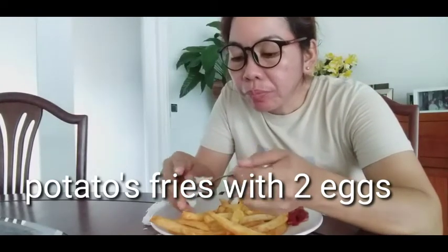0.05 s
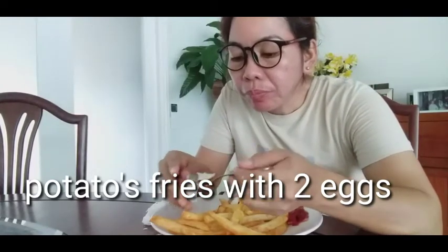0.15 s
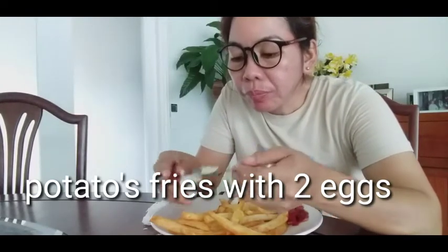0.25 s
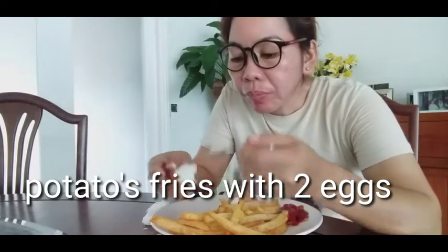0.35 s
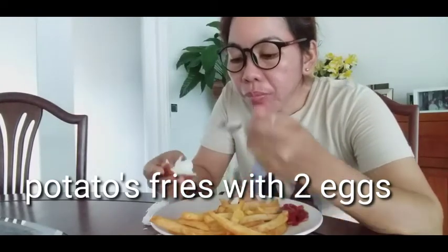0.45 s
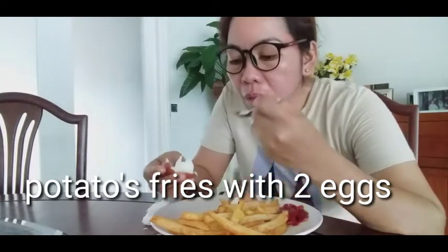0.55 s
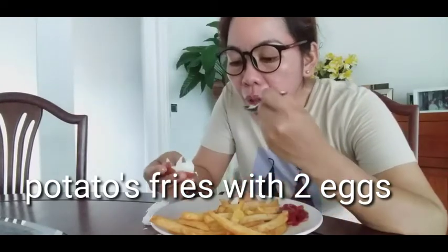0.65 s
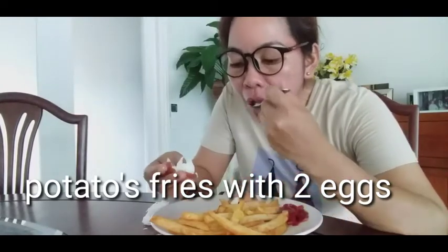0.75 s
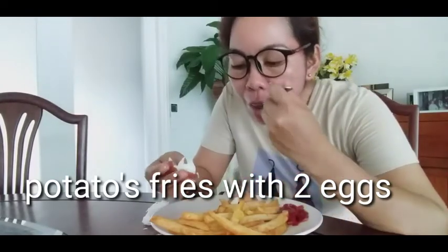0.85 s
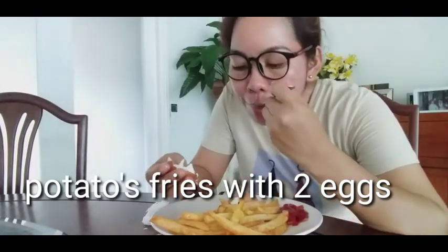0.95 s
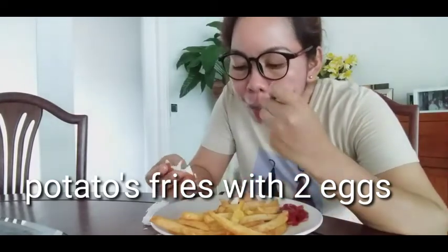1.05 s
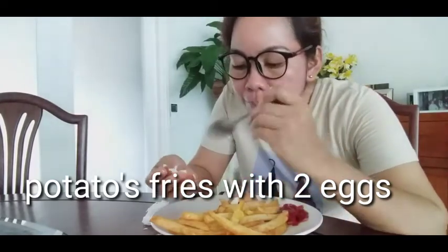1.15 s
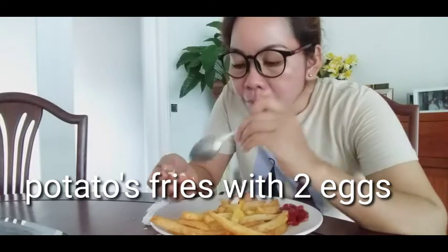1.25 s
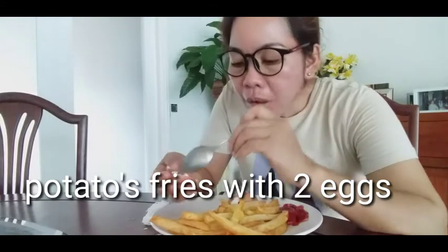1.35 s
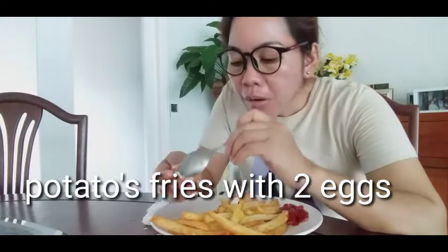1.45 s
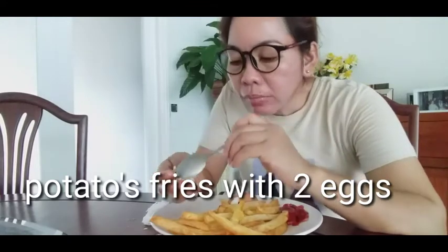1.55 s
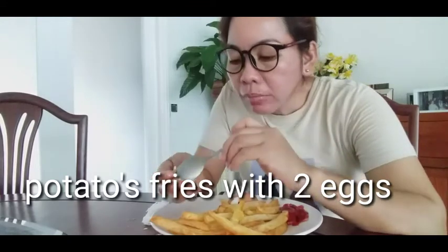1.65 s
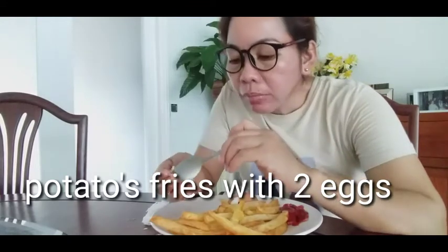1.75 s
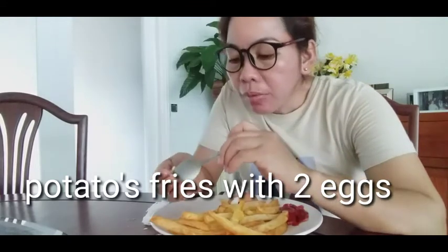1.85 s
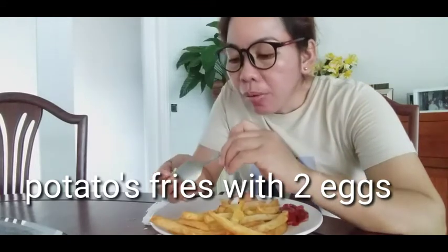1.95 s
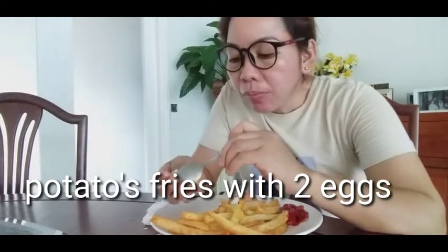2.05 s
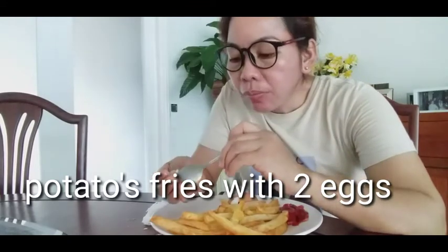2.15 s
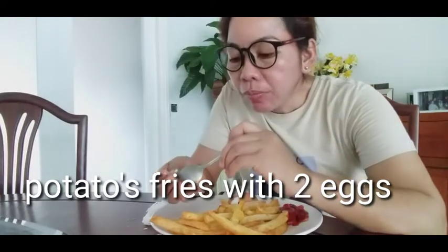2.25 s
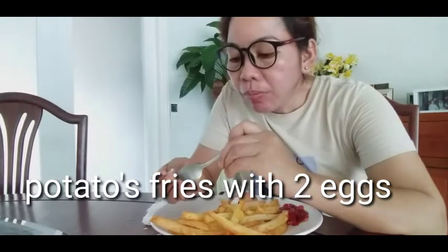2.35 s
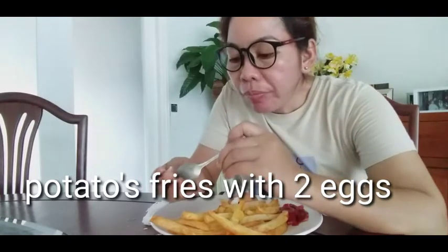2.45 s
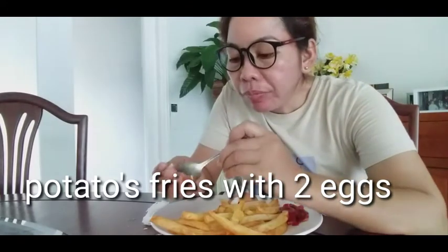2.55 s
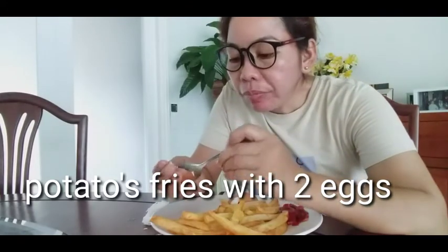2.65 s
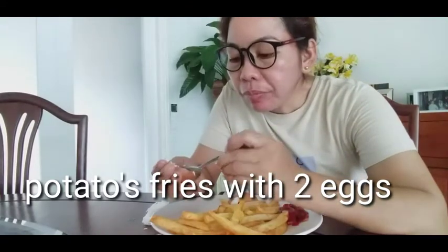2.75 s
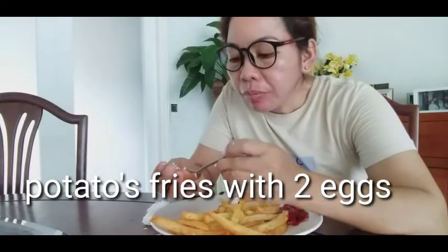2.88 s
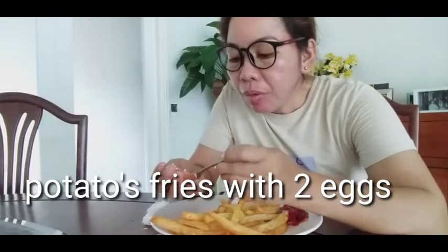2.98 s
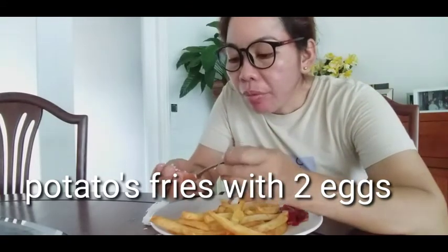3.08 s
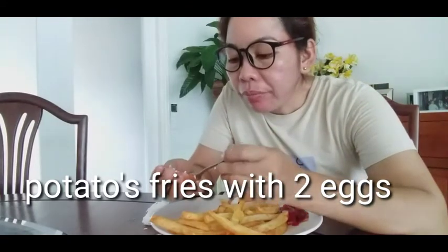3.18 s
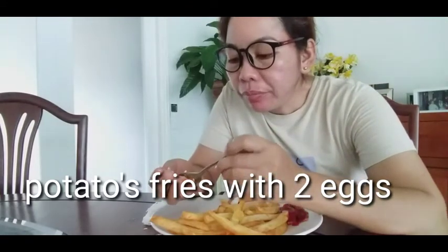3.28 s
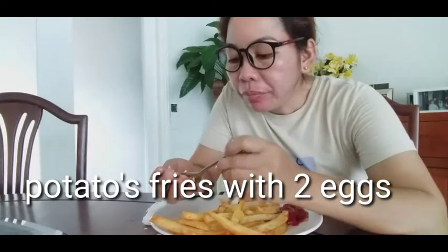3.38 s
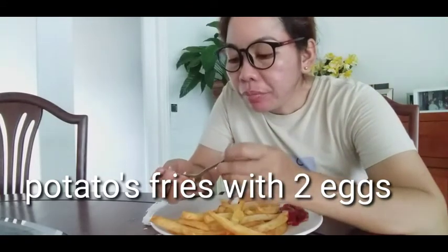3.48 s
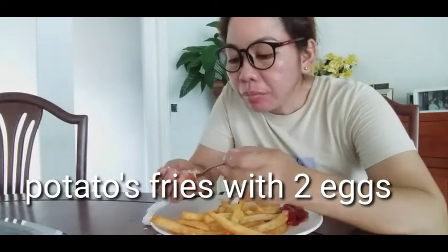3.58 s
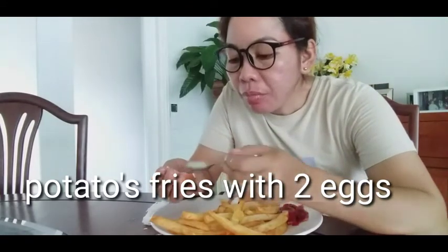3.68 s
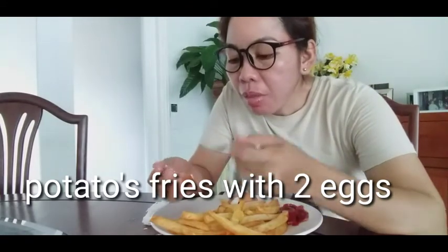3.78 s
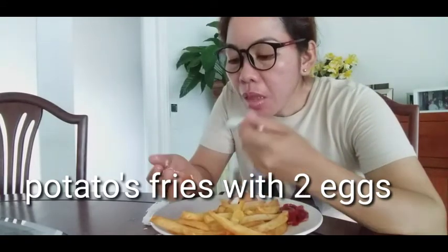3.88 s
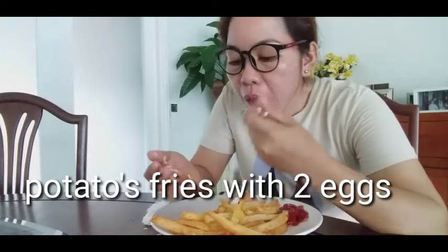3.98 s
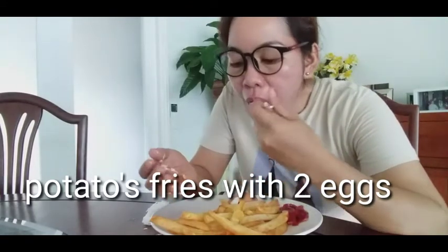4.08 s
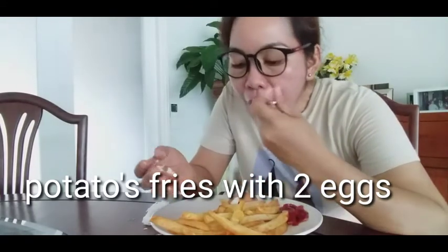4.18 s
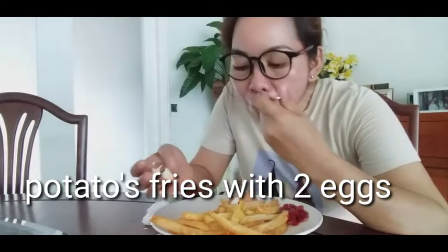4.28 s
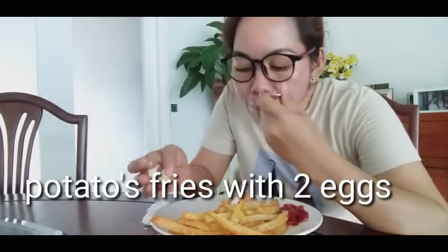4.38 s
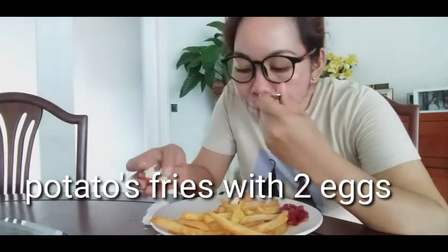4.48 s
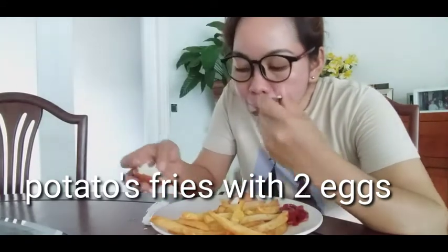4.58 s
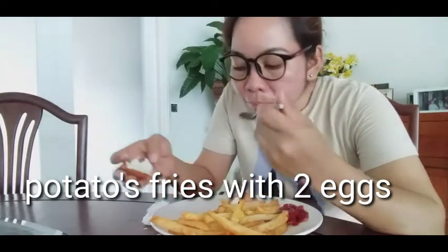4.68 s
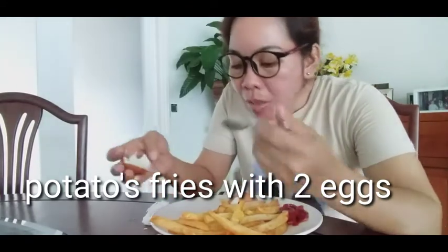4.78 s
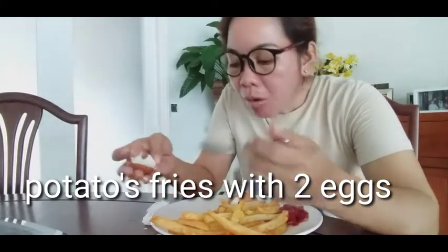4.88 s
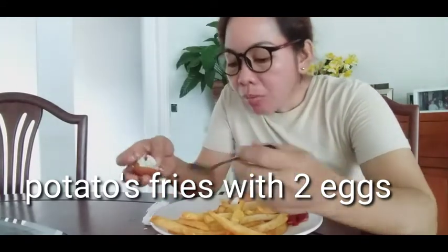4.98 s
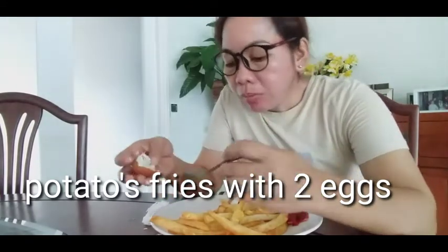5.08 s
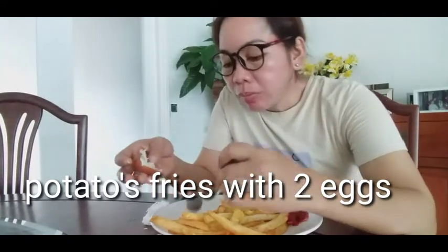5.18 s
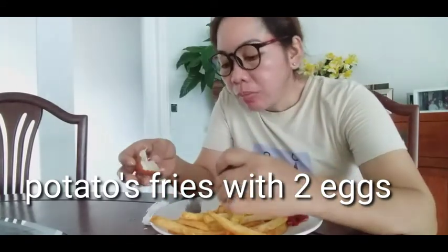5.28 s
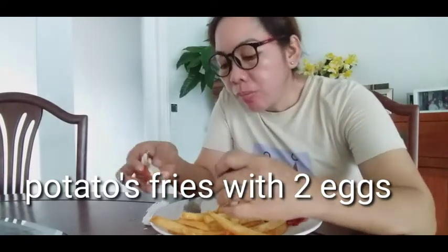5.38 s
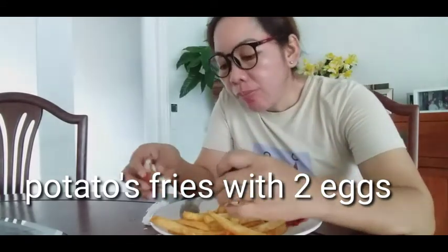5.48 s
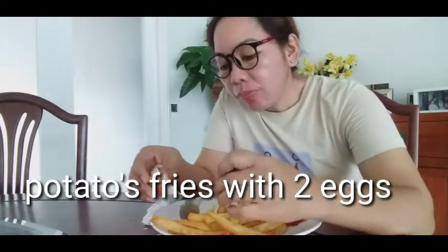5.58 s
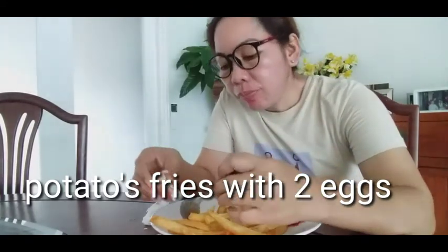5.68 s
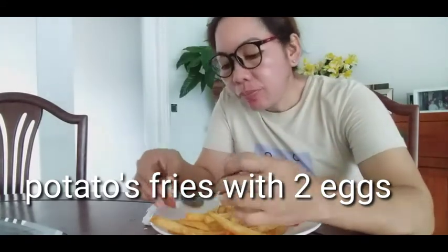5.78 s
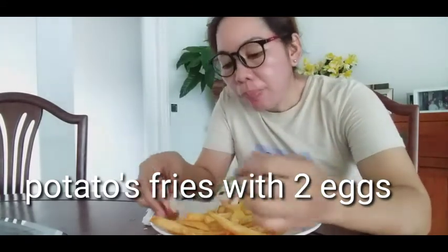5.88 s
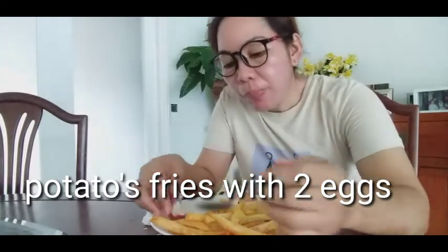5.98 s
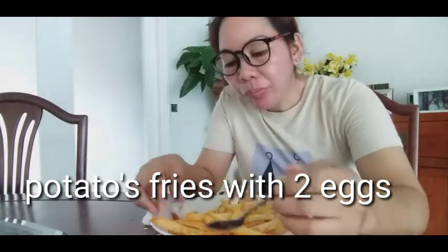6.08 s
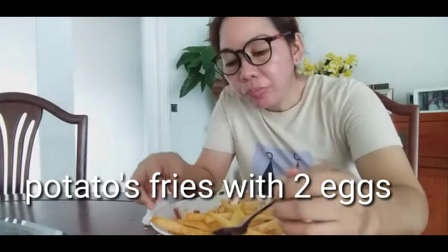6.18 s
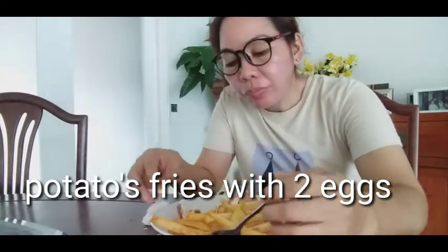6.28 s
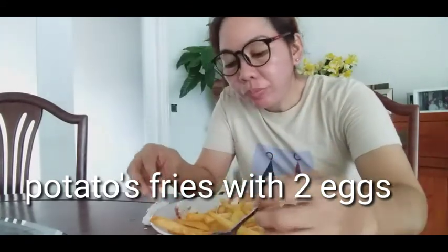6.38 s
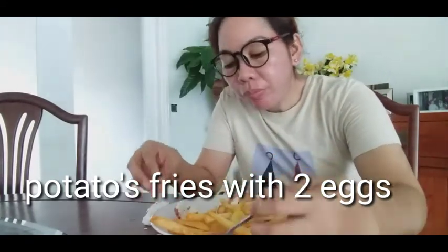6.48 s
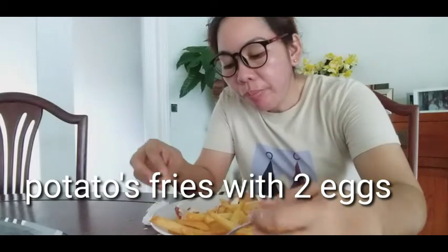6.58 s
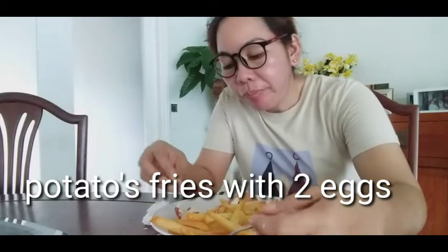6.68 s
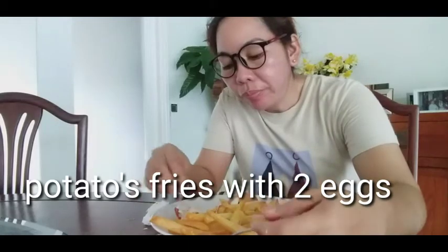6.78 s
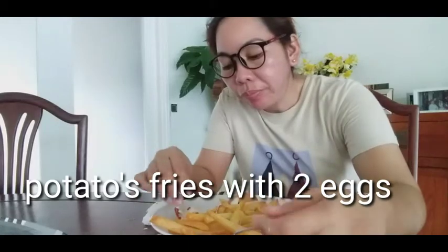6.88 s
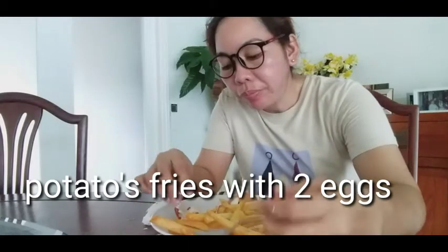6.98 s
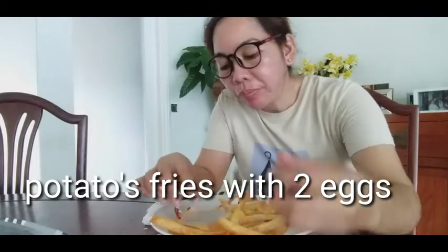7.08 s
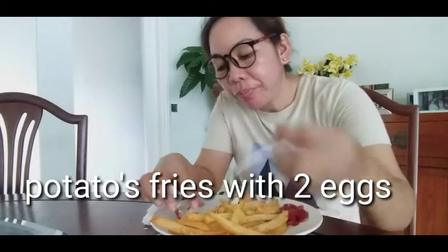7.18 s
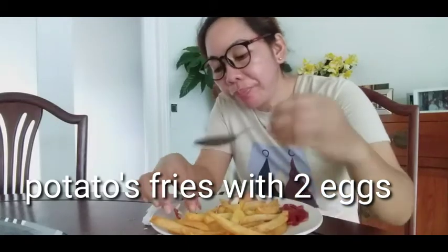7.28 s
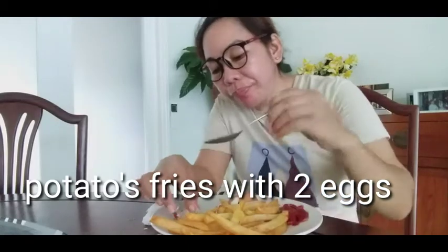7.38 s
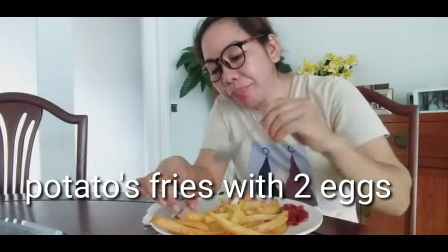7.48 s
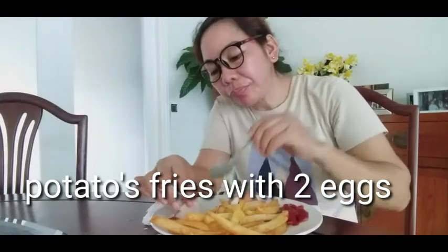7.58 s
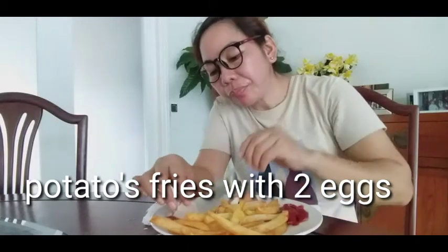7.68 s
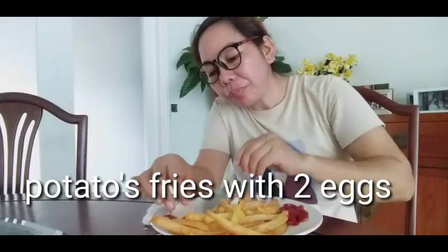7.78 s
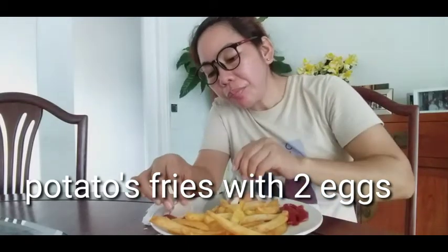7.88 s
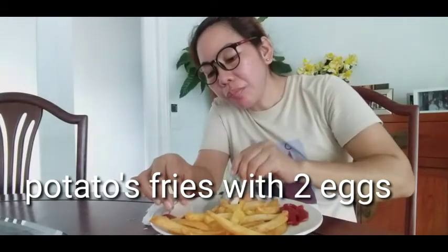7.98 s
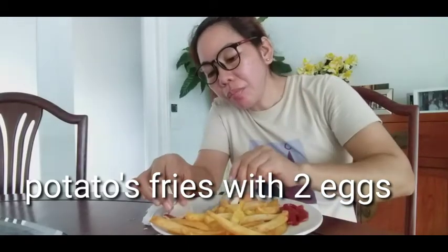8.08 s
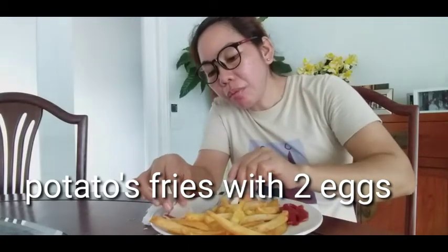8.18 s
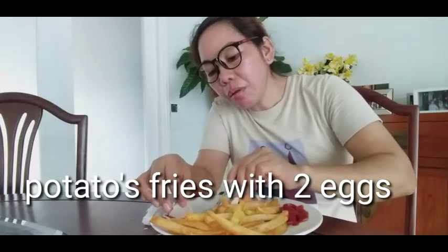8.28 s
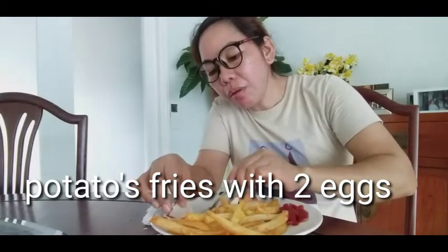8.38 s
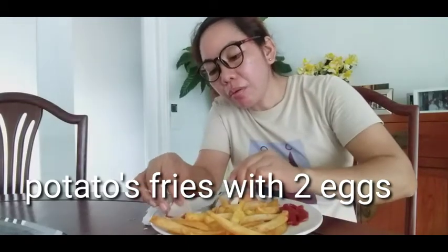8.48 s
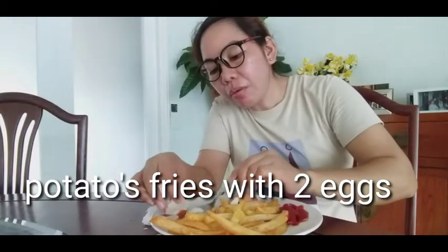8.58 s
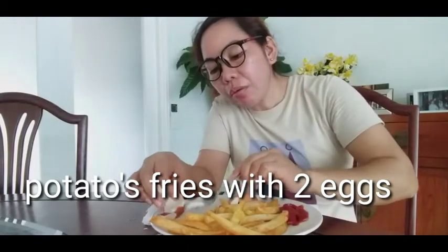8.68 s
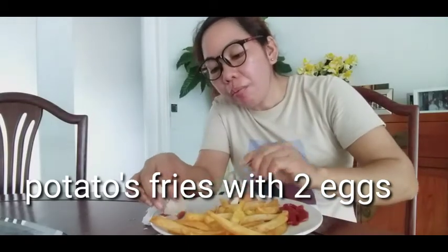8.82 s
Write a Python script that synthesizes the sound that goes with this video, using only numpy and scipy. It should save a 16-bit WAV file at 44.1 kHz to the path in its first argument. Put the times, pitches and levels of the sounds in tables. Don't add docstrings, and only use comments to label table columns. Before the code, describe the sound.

A faint engine speeds away outside over low room hum. Near the microphone, egg knocks start softly, then shell snaps in irregular brittle ticks with a few sharp peaks. After a thinner stretch, a steel spoon hits a ceramic plate on a wooden table, bright and briefly ringing, the second big blow hardest. A softer thudding tap and two short drags over the glaze end it, with slight indoor echo.

```python
import sys
import numpy as np
from scipy import signal
from scipy.fft import rfft, irfft
from scipy.io import wavfile

SR = 44100
rng = np.random.default_rng(int(sys.argv[2]) if len(sys.argv) > 2 else 0)


def unload_audio(sound):
    columns = np.transpose(np.atleast_2d(sound))
    steps = np.round(np.clip(columns, -1, 1) * 32767)
    wavfile.write(sys.argv[1], SR, steps.astype(np.int16))


def ratio_of_db(decibels):
    return 10 ** (np.asarray(decibels, float) / 20)


N = 390285


def rms_one(x):
    return x / np.sqrt(np.mean(x ** 2) + 1e-20)


def at_hz(points, hz):
    table_hz, values = np.array(points).T
    return np.interp(np.log(hz + 1), np.log(table_hz), values)


def in_time(points):
    s, values = np.transpose(points)
    return np.interp(np.arange(N) / SR, s, values)


def drift(rate_hz):
    knots = rng.standard_normal(1000)
    return 1.2 * np.interp(np.arange(N) / SR * rate_hz, np.arange(1000), knots)


def ring(clicks, hz, t60):
    r, w = ratio_of_db(-60 / (t60 * SR)), 2 * np.pi * hz / SR
    return signal.lfilter([0, np.sin(w)], [1, -2 * r * np.cos(w), r * r], clicks + 1e-18)


def struck(modes):
    click = np.eye(1, SR)[0]
    out = np.zeros(SR)
    for k, (hz, db, t60) in enumerate(modes):
        sign = (-1) ** (k // 2)
        out += sign * ratio_of_db(db) * ring(click, hz, t60)
    return out


def band(x, low_hz, high_hz):
    return signal.sosfilt(signal.butter(2, [low_hz, high_hz], "band", fs=SR, output="sos"), x)


def coloured(spectrum, size):
    hz = np.arange(size // 2 + 1) * SR / size
    shaped = rfft(rng.standard_normal(size)) * ratio_of_db(at_hz(spectrum, hz))
    return rms_one(irfft(shaped, size))


def add(out, sound, s):
    at = round(s * SR)
    out[at:at + len(sound)] += sound[:N - at]


# time in seconds, firing rate in Hz.
ENGINE_SPEED = [(0, 67), (.7, 72.4), (1.45, 80.1), (1.8, 81.1), (2.3, 87.65), (3.6, 88.5)]
# start in seconds, length in seconds, # level in dB of the 2nd multiple, level
# in dB of the 3rd multiple.
SURGES = [
    (-.03, 0.29, -86, -57),
    (.33, 0.11, -73, -64),
    (.58, 0.097, -57.5, -67),
    (.87, 0.18, -59.5, -62),
    (1.13, 0.09, -58.5, -78),
    (1.42, 0.32, -55, -68),
    (2.05, 0.271, -65, -71),
    (2.67, 0.11, -59.5, -84),
    (2.97, 0.13, -62, -68.5),
    (3.47, 0.088, -62, -87),
]


def engine():
    t = np.arange(N) / SR
    phase = 2 * np.pi * np.cumsum(in_time(ENGINE_SPEED)) / SR
    recede_db = -8.5 * t
    second = ratio_of_db(-69 + recede_db)
    third = second
    edge_s = 0.031
    for s, length, second_db, third_db in SURGES:
        surge = np.clip(np.minimum(t - s, s + length + edge_s - t) / edge_s, 0, 1)
        second = second + ratio_of_db(second_db) * surge
        third = third + ratio_of_db(third_db) * surge
    upper = ratio_of_db(-68 + recede_db) * np.minimum(t / 0.36, 1)
    levels = [ratio_of_db(-9.5) * second, second, third, ratio_of_db(-14.5) * third, ratio_of_db(-0.5) * upper, upper]
    return 2 ** .5 * sum(level * np.sin((k + 1) * phase) for k, level in enumerate(levels))


def fridge_hum():
    hum_hz, hum_db = 98.4, -65.5
    level = ratio_of_db(hum_db + 2.2 * drift(6.4))
    return 2 ** .5 * level * np.sin(2 * np.pi * hum_hz * np.arange(N) / SR)


# frequency in Hz, density in dB per Hz.
AIR = [(34, -44), (52, -14.5), (95, -2.5), (140, -7), (230, -4.5), (330, -11), (450, -14), (600, -21.5),
       (850, -17.5), (2400, -22), (4000, -22), (6000, -29), (9300, -32), (15500, -29)]
# time in seconds, level in dB about its mean.
BUSTLE = [(0, -7.5), (.55, -4.5), (1.2, -5.5), (2.2, -4.5), (3.7, -1.5), (5.1, 0), (5.7, 2), (6.7, 2.5),
          (7.2, 0.5), (7.8, 2.5), (8.3, 1.5), (8.85, 0)]
# level in dB, share of the bustle's swing.
LAYERS = [
    (-59, 0.84),
    (-69.5, 1),
    (-66.5, 0.4),
    (-74.5, .55),
]


def air():
    spectrum = rfft(coloured(AIR, N + N % 2)[:N])
    hz = np.arange(N // 2 + 1) * SR / N
    centres_hz = [350, 800, 2800, 7000]
    bustle_db = in_time(BUSTLE)
    parts = []
    for (db, share), weights in zip(LAYERS, np.eye(4)):
        part = irfft(spectrum * at_hz(list(zip(centres_hz, weights)), hz), N)
        parts.append(ratio_of_db(db + share * bustle_db + 1.7 * drift(7.0)) * rms_one(part))
    wash_db, wash_end_s, wash_fade_s = 4.5, 2.42, 0.9
    wash = ratio_of_db(wash_db * np.clip((wash_end_s - np.arange(N) / SR) / wash_fade_s, 0, 1))
    return wash * parts[0] + sum(parts[1:])


def snaps(rows, bright_db, body_db):
    pitched, wide, t = np.zeros(N), np.zeros(N), np.arange(3000) / SR
    for s, peak_db, hz, spread_db in rows:
        burst = rng.standard_normal(3000)
        snap = burst * ratio_of_db(-60 * t / 0.0079)
        snap = snap / np.sqrt(np.sum(snap ** 2) / 100)
        splinters = 6.4 * burst * (rng.random(3000) < 220 / SR) * ratio_of_db(-60 * t / 0.12)
        splintered = snap + splinters
        tone = band(snap + 0.52 * splinters, hz * 0.85, min(hz * 1.077, 15000))
        spit = ratio_of_db(spread_db) * band(splintered, 2600, 9500)
        spit = spit + ratio_of_db(bright_db + 2.5) * band(splintered, 9500, 15000)
        body = ratio_of_db(body_db + 3) * band(snap, 2100, 4000)
        add(pitched, ratio_of_db(peak_db + 1.5) * tone, s)
        add(wide, ratio_of_db(peak_db - 3.0) * (spit + body), s)
    return np.array([pitched, wide])


# start in seconds, peak in dB, centre in Hz, level of the wide spit in dB.
KNOCKS = [
    (0.5995, -59, 4230, -18),
    (0.6125, -51, 3940, -8),
    (1.1213, -66, 4410, 2),
    (4.9277, -59.5, 5050, 2),
]


def egg_knocks():
    return snaps(KNOCKS, bright_db=-16, body_db=5)


# start in seconds, peak in dB, centre in
# Hz, level of the wide spit in dB.
SHELL = [(1.4246, -41, 4760, -10.5), (1.4549, -46, 4840, -10), (1.4745, -29, 4330, -21),
         (1.506, -47, 5150, -11), (1.6095, -42, 4990, -10), (1.628, -46, 4750, -10),
         (1.7533, -52, 5400, 1.5), (2.0629, -48, 10700, -1.5), (2.0945, -46, 4960, -1),
         (2.1832, -31, 6500, 1.5), (2.4759, -48, 5130, -4), (2.58, -47.5, 5210, -3),
         (2.6897, -36.5, 5070, -13.5), (2.7481, -55, 5170, -1), (2.776, -44.5, 5060, -9),
         (2.8179, -42.5, 5600, -11), (2.842, -50, 5000, -8), (3.0195, -44.5, 5900, -8),
         (3.0319, -41.5, 8360, -7.5), (3.0555, -47, 5880, -13), (3.2155, -54, 8500, 8.5),
         (3.2635, -40.5, 5200, -1.5), (4.3874, -45.5, 5620, -6.5), (4.4728, -44, 5960, -4.5),
         (5.0574, -43, 6100, -8.5), (5.1178, -49, 4630, -4), (7.3975, -49.5, 4070, -7.5)]


def shell_cracks():
    return snaps(SHELL, bright_db=-27, body_db=-18)


# start in seconds, peak in dB, centre in Hz, level of the wide spit in dB.
TEARS = [
    (1.5818, -55, 4330, 1),
    (2.1925, -32, 4500, -19),
    (2.1966, -36.5, 4640, -11),
    (2.2582, -57, 6340, -10),
    (2.3159, -42, 5560, -5),
    (2.328, -50, 5600, -12),
    (3.806, -56.5, 7750, 1.5),
]


def shell_tears():
    return snaps(TEARS, bright_db=-12, body_db=-10)


# start in seconds, peak in dB, centre in Hz.
CRUMBS = [(2.3093, -48, 6560), (3.3618, -54, 8370), (4.7825, -52.5, 6880), (5.2274, -39, 7600),
          (5.567, -50, 7600), (5.5874, -46.5, 8070), (5.6136, -48, 7110), (5.9808, -52, 12000),
          (6.0402, -55, 7600), (6.5254, -49, 8590), (8.2916, -58, 6930), (8.3397, -59, 7190),
          (8.526, -57, 6880)]


def crumb_ticks():
    spread_db = -14
    rows = [(s, peak_db, hz, spread_db) for s, peak_db, hz in CRUMBS]
    return snaps(rows, bright_db=-14, body_db=-33.5)


# frequency in Hz, level in dB, t60 in seconds.
TAP = [(3830, -21, 0.011), (4480, -23, 0.0091), (3880, -50.5, 0.12), (6250, -39, 0.0057),
       (8070, -42, 0.00411)]


def light_touch():
    out, t = np.zeros(N), np.arange(3000) / SR
    fade = np.minimum(40 * (t[-1] - t), 1)
    add(out, struck(TAP)[:3000] * np.minimum(t / .001, 1) * fade, 5.2115)
    return out


# start in seconds, peak in dB, crack in dB, table thud in dB.
BLOWS = [
    (5.3118, -18.5, -1.5, -7),
    (5.9364, -40.5, -1.5, -5),
    (6.2500, -15, 3, -10),
    (7.871, -31, 7, 0),
]
SPLASH_DB = [13.7, 9.7, 4.7, 15.4]
CONTACT_DB = [4.5, 1.5, 5, -3]
# frequency in Hz, density in dB per Hz.
CRACK = [(300, -20.5), (700, -11.5), (1800, 0), (2450, 2), (4500, 4), (6500, -8.5), (9000, -14.5),
         (12500, -25), (14300, -20.5), (15800, -22)]
# frequency in Hz, level in dB, t60 in seconds.
BOWL = [(4454, -4, 0.018), (6170, -9.5, 0.014)]
# frequency in Hz, level in dB, t60 in seconds.
TABLE = [(107.6, -11, 0.14), (186.3, -1, 0.051), (275.4, -7.5, 0.073), (361, -6.5, 0.05), (506, -13, 0.077),
         (738, -25, 0.079)]
PLATE_HZ = [645, 1240, 1925, 1965, 2742, 3052, 3095, 3240, 3660, 3715, 4295, 4405, 4490, 4610, 4700, 4752,
            4834, 5212, 5865, 5965, 7050, 7345, 8635, 8795, 10155, 10280, 11740, 11885, 14470, 14860]
# t60 in seconds, then strength in dB in each
STRENGTH = [(0.045, -16.0, -10.0, -9.0, -9.0), (0.11, -23.0, -22.0, -22.0, -23.0),
            (0.15, -15.0, -10.0, -23.0, -15.0), (0.085, -10.0, -9.0, -11.0, -21.0),
            (0.14, -37.0, -5.0, -15.0, -18.0), (0.3, -14.0, -24.0, -33.0, -7.0),
            (0.17, -20.0, -29.0, -23.0, -1.0), (0.098, -20.0, -31.0, -19.0, -8.0),
            (0.095, -13.0, -10.0, -10.0, -41.0), (0.13, -37.0, -19.0, -5.0, -42.0),
            (0.11, -3.0, -18.0, -28.0, -13.0), (0.072, -2.0, -17.0, -28.0, 3.0),
                   (0.061, -4.0, -18.0, -7.0, 4.0), (0.09, -17.0, -21.0, -9.0, -12.0),
                   (0.09, -13.0, -6.0, -4.0, -10.0), (0.14, -12.0, -5.0, 1.0, -16.0),
                   (0.051, -23.0, -10.0, -6.0, -24.0), (0.096, -8.0, -17.0, -14.0, -21.0),
            (0.074, -5.0, -25.0, -19.0, -18.0), (0.075, -6.0, -20.0, -31.0, -12.0),
                  (0.1, -33.0, -32.0, -23.0, -17.0), (0.084, -9.0, -32.0, -37.0, -13.0),
                  (0.16, -15.0, -42.0, -13.0, -13.0), (0.09, -18.0, -31.0, -38.0, -7.0),
                  (0.125, -24.0, -29.0, -13.0, -10.0), (0.08, -19.0, -25.0, -30.0, -8.0),
                  (0.096, -20.0, -31.0, -17.0, -19.0), (0.061, -18.0, -28.0, -31.0, -4.0),
                  (0.045, -18.0, -29.0, -30.0, -8.0), (0.05, -18.0, -27.0, -31.0, -15.0)]


def blows():
    out, t = np.zeros(N), np.arange(SR) / SR
    t60, *strengths_db = np.transpose(STRENGTH)
    t60 = np.minimum(t60, 0.3)
    contact = rms_one(band(np.eye(1, SR, 48)[0], 2800, 6000)) / 60
    contact = contact + struck(BOWL) * np.minimum(t / .001, 1)
    thud = struck(TABLE) * np.minimum(t / 0.008, 1)
    each = zip(BLOWS, strengths_db, SPLASH_DB, CONTACT_DB)
    for (s, peak_db, crack_db, thud_db), mode_db, splash_db, contact_db in each:
        crack = coloured(CRACK, SR) * (ratio_of_db(-60 * t / 0.011) + 0.22 * ratio_of_db(-60 * t / 0.21))
        crack = crack + ratio_of_db(splash_db) * band(crack, 9000, 22000)
        plate = struck(zip(PLATE_HZ, mode_db, t60)) + ratio_of_db(crack_db) * crack
        body = plate * np.minimum(t / 0.00079, 1)
        body = body + ratio_of_db(contact_db) * contact + ratio_of_db(thud_db + 2.5) * thud
        add(out, ratio_of_db(peak_db) * body, s)
    return out


# start in seconds, level in dB, low edge in Hz, high edge in Hz.
BRUSH = (7.357, -42, 603.5, 2599.5)


def hand_brush():
    out, t = np.zeros(N), np.arange(3000) / SR
    s, db, low_hz, high_hz = BRUSH
    add(out, ratio_of_db(db - 60 * t / 0.13) * band(rng.standard_normal(3000), low_hz, high_hz), s)
    return out


# start in seconds, press-in in seconds, hold in seconds,
# level in dB, lift-off in dB per second.
STROKES = [
    (7.961, 0.061, 0.06, -41.5, 240),
    (8.356, 0.047, .004, -51.5, 383),
]
DRAG_HZ = [
    [1865, 1960, 2824, 3098, 4340, 5895, 5986, 6907, 9063, 10380, 12100],
    [2740, 3068, 4105, 4258, 4476, 5469, 5782, 5970, 10200],
]
# width in Hz, level in dB, lag in seconds.
DRAG_MODES = [
    [(50, -2.5, -0.018), (44.3, 0, 0.021), (90, -2.5, 0.012), (60, -5, -0.011), (150, -10, -0.035),
     (50, -8.5, .01), (60.5, -8, 0.01), (50, -19, .02), (40, -22, .03), (150, -15, 0.016),
     (150, -30.5, .01)],
    [(40, -4, -0.014), (50, -6, -0.014), (40, -6.5, .02), (70, 1, -0.013), (70, -4.5, 0.0065),
     (90, -2, 0.0072), (90, -4, -0.00094), (90, -8.5, 0.037), (200, -13, -.01)],
]


def drags():
    out, t = np.zeros(N), np.arange(N) / SR
    slips_per_s, touch_db = 1500, -12
    for (s, press_s, hold_s, level_db, lift), pitches, modes in zip(STROKES, DRAG_HZ, DRAG_MODES):
        slips = (rng.random(N) < slips_per_s / SR) * rng.standard_normal(N)
        weight_db = touch_db * np.clip(1 - (t - s) / press_s, 0, 1)
        weight_db = weight_db - lift * np.maximum(t - s - press_s - hold_s, 0)
        pushed = (t > s) * ratio_of_db(level_db + weight_db - 4.5) * rms_one(slips)
        for hz, (width, db, lag) in zip(pitches, modes):
            late = np.roll(pushed, round(lag * SR))
            out += 2.12 * ratio_of_db(db) * (width / SR) ** .5 * ring(late, hz, 3.6 / width)
        out += 0.31 * band(pushed, 1740, 15000)
    return out


# frequency in Hz, t60 in seconds.
ROOM_T60 = [(100, 0.96), (650, 0.68), (1500, 0.7), (4000, 0.61), (12000, 0.52)]


def room(x):
    t, edges = np.arange(SR) / SR, 60 * 2. ** np.arange(9)
    echoes = np.zeros(SR)
    for low, high in zip(edges, edges[1:]):
        t60 = at_hz(ROOM_T60, (low * high) ** .5)
        echoes += band(rng.standard_normal(SR), low, high) * ratio_of_db(-60 * t / t60)
    echoes *= np.clip((t - .003) / 0.0027, 0, 1)
    return signal.fftconvolve(x, echoes / np.sqrt(np.sum(echoes ** 2)))[:N]


def scene():
    background = engine() + fridge_hum() + air()
    pitched, wide = egg_knocks() + shell_cracks() + shell_tears() + crumb_ticks()
    pitched = pitched + light_touch()
    wide = wide + hand_brush()
    hits = blows() + drags()
    wet = room(ratio_of_db(-6) * hits + ratio_of_db(-9.5) * pitched + ratio_of_db(0.5) * wide)
    return (hits + pitched + wide + wet + background)[None]


def top_cut(x):
    return signal.sosfilt(signal.butter(12, 16800, fs=SR, output="sos"), x)


def record(dry):
    low_pass = signal.cheby2(14, 27, 15950, fs=SR, output="sos")
    finished = signal.sosfilt(low_pass, dry)
    return top_cut(finished)


dry = scene()
out = record(dry)
unload_audio(out)
```